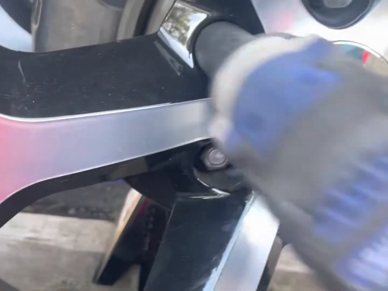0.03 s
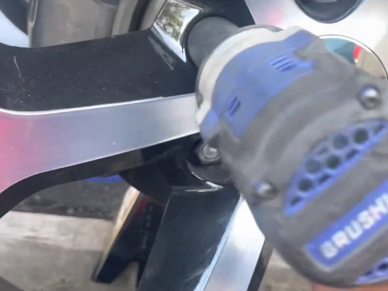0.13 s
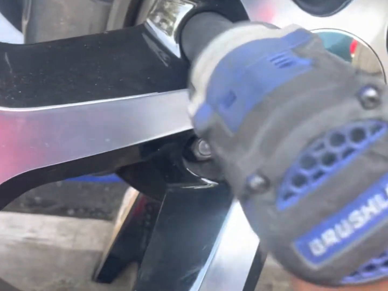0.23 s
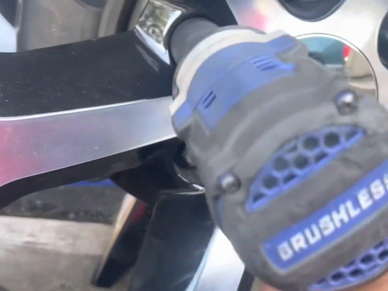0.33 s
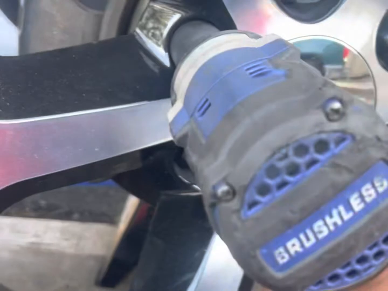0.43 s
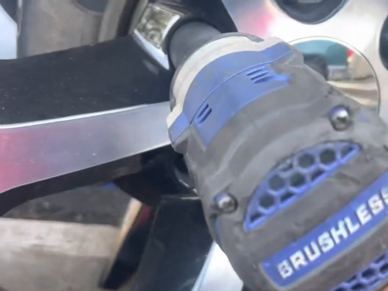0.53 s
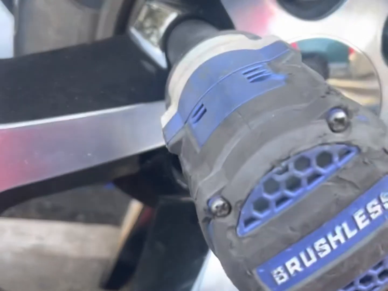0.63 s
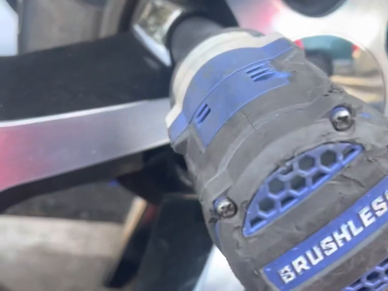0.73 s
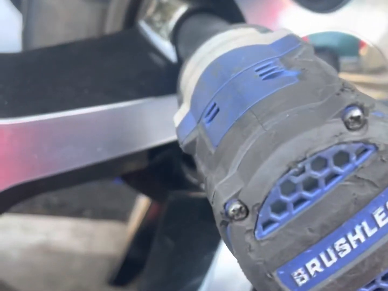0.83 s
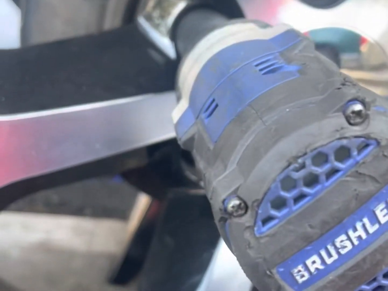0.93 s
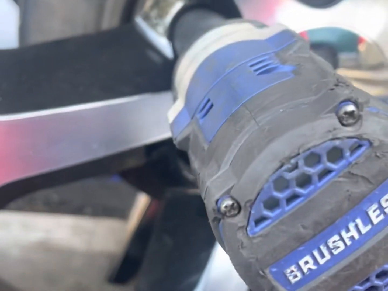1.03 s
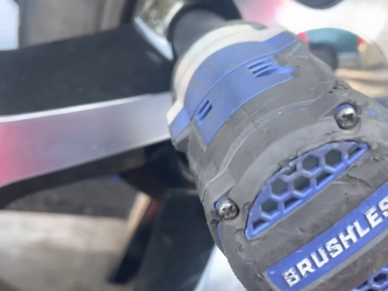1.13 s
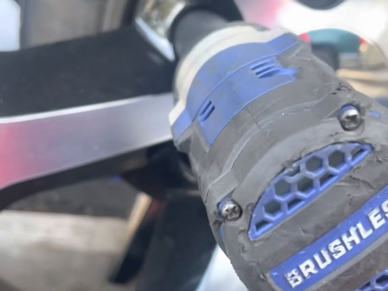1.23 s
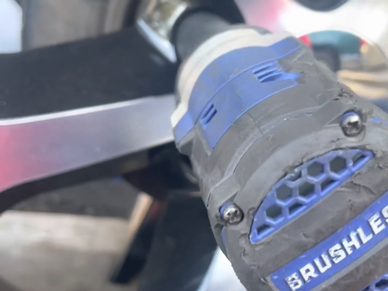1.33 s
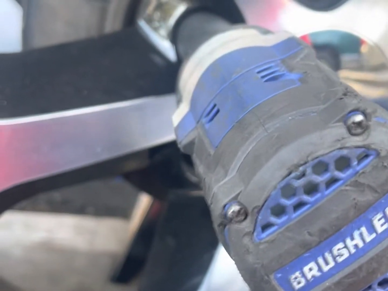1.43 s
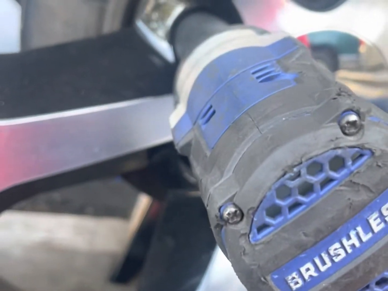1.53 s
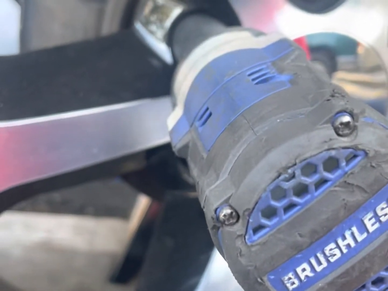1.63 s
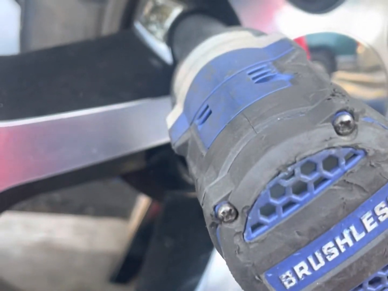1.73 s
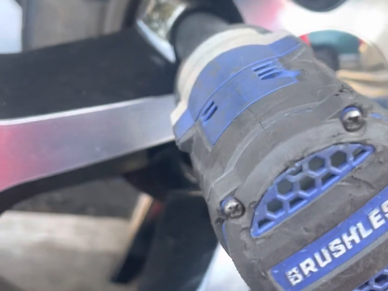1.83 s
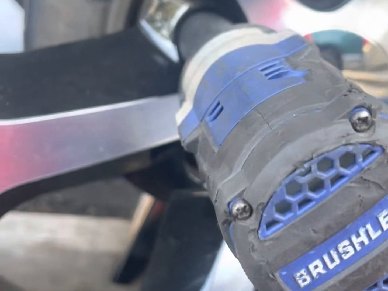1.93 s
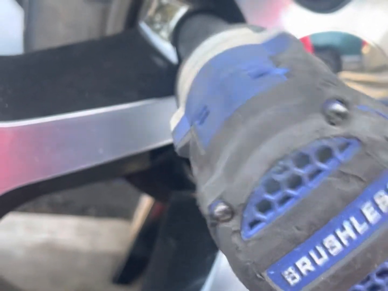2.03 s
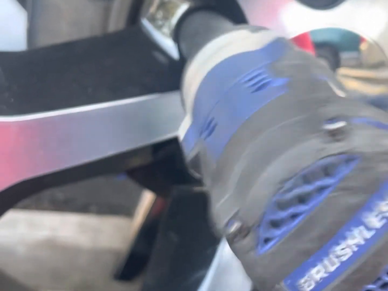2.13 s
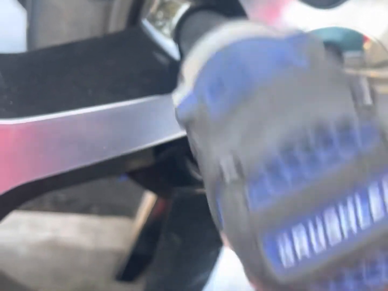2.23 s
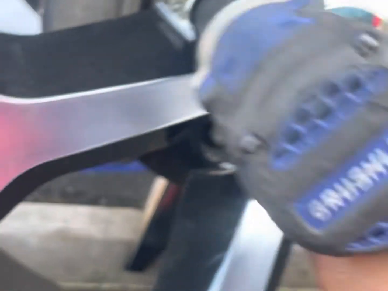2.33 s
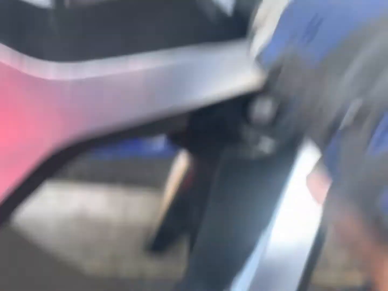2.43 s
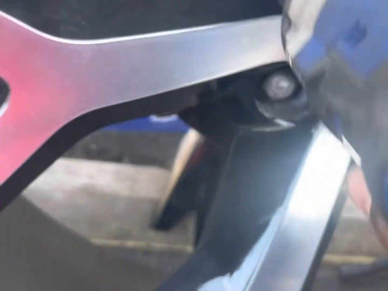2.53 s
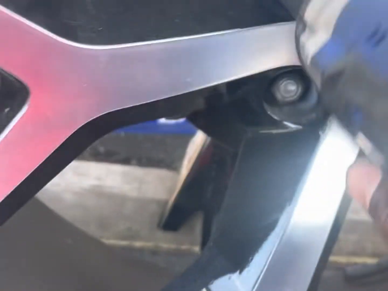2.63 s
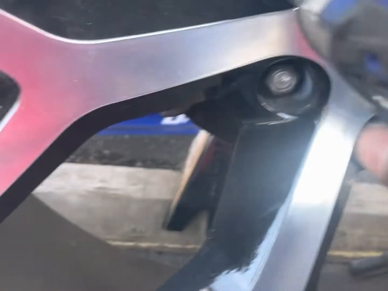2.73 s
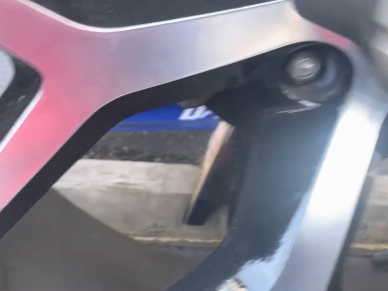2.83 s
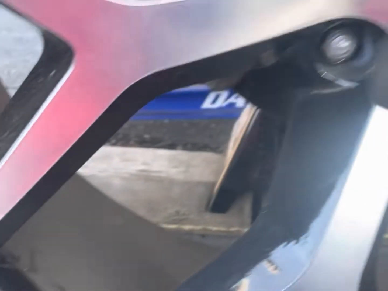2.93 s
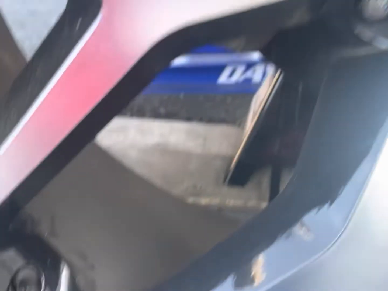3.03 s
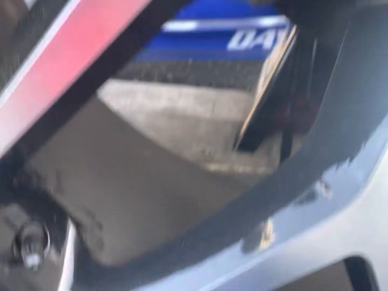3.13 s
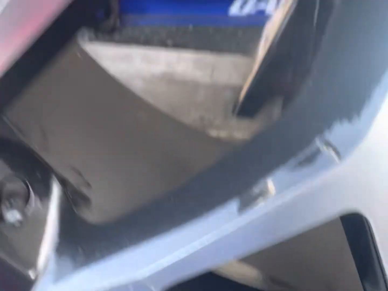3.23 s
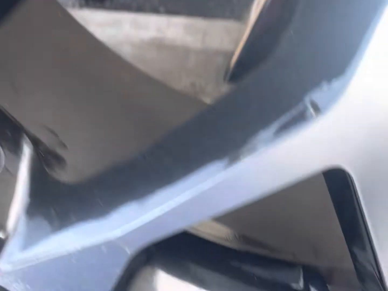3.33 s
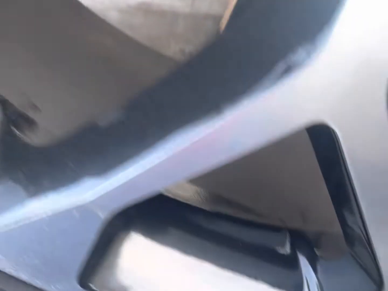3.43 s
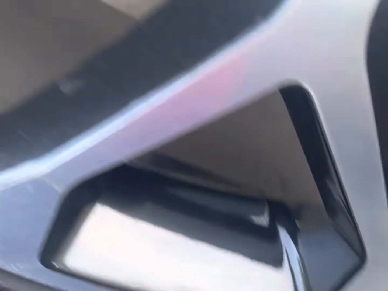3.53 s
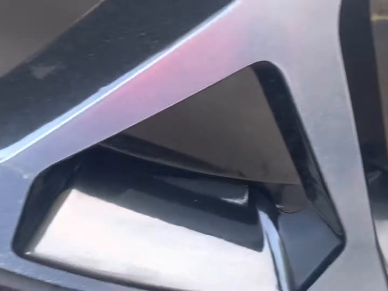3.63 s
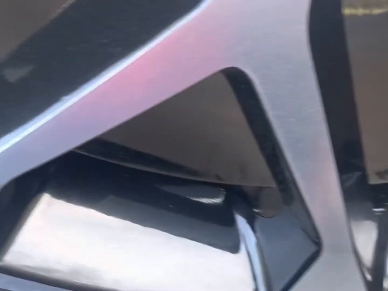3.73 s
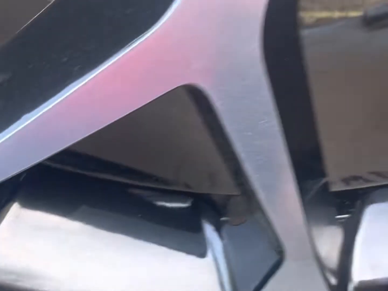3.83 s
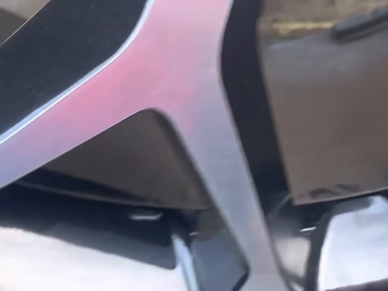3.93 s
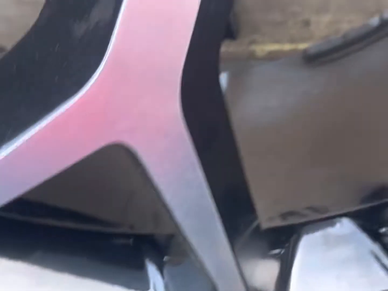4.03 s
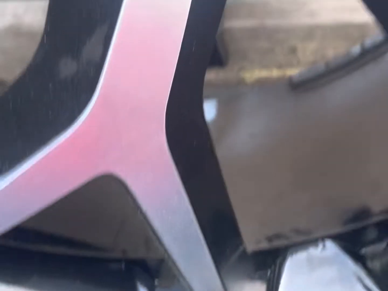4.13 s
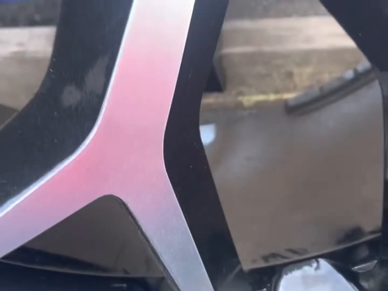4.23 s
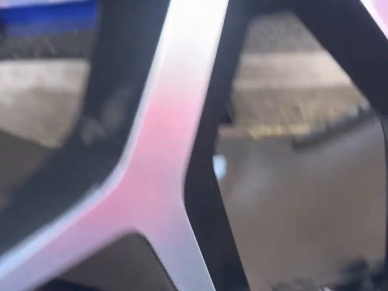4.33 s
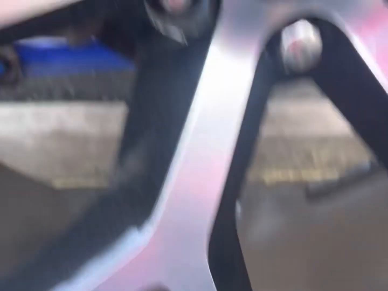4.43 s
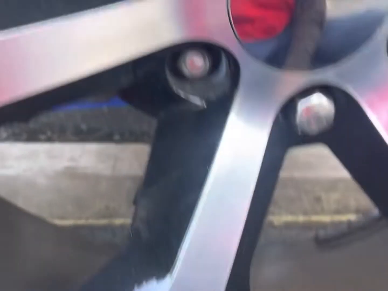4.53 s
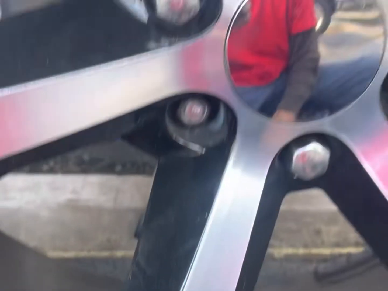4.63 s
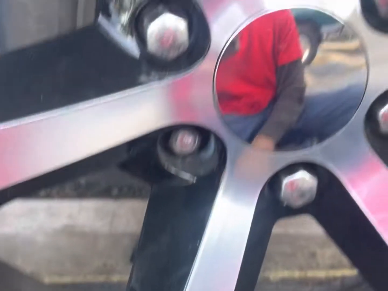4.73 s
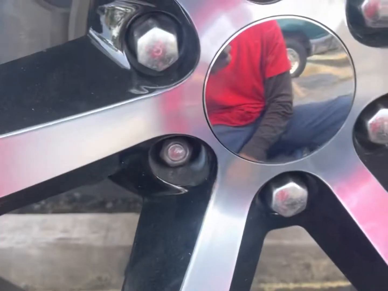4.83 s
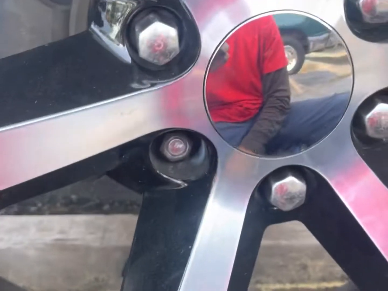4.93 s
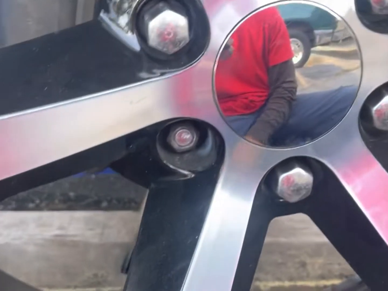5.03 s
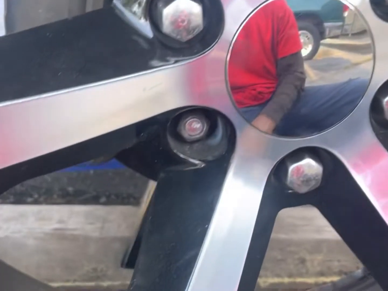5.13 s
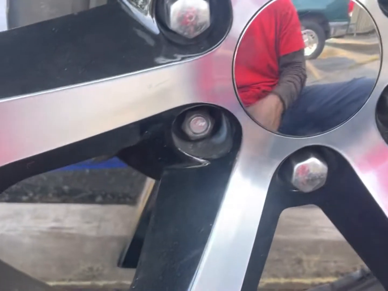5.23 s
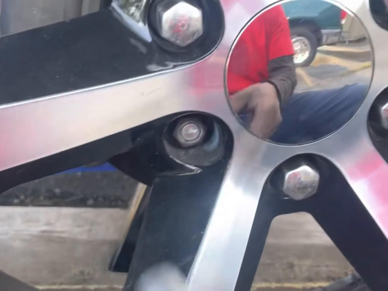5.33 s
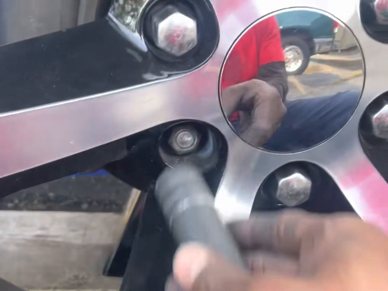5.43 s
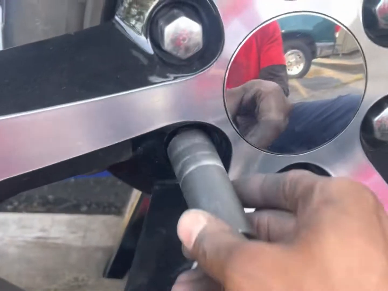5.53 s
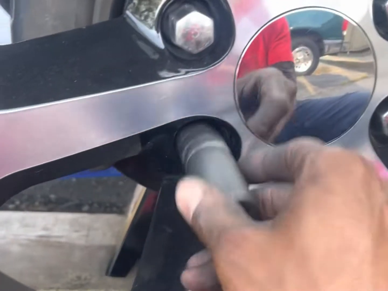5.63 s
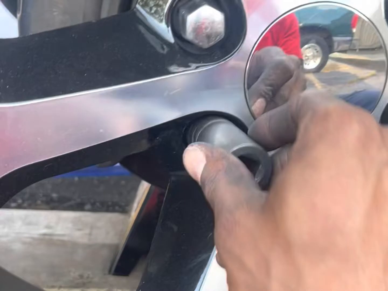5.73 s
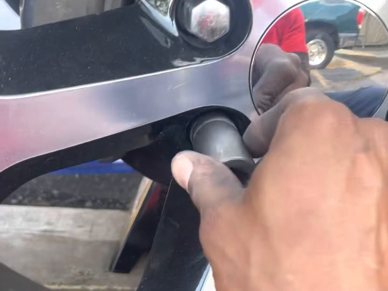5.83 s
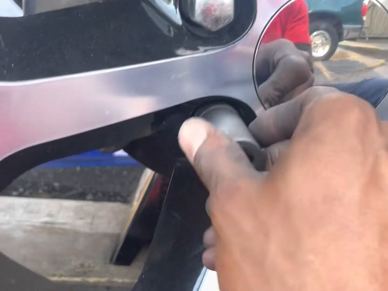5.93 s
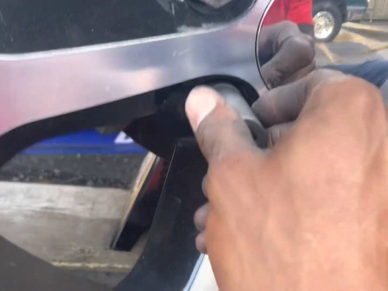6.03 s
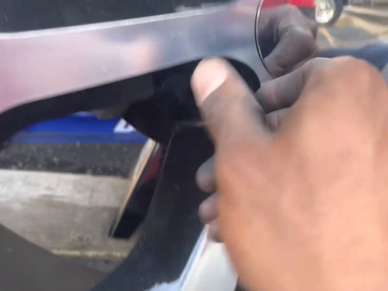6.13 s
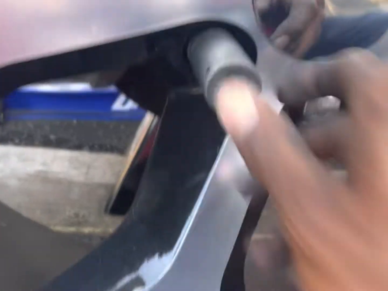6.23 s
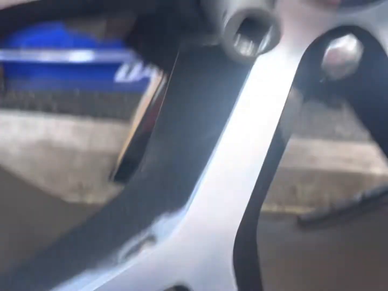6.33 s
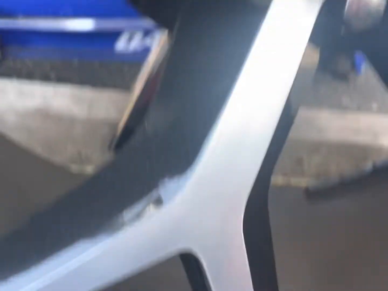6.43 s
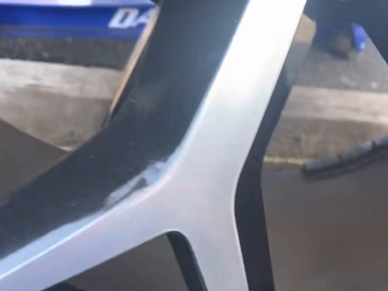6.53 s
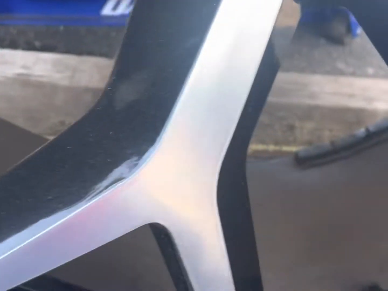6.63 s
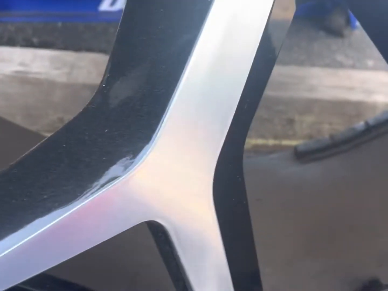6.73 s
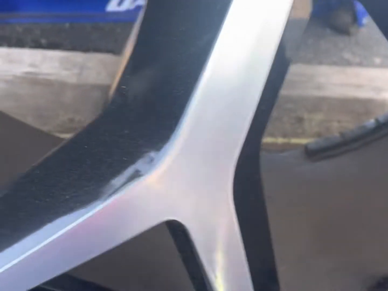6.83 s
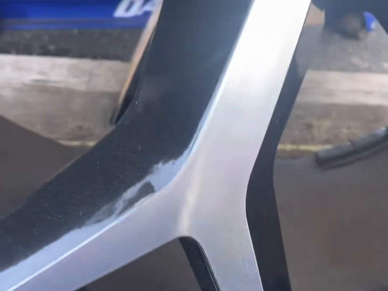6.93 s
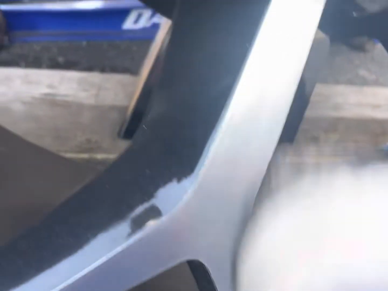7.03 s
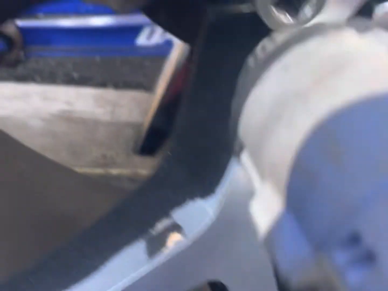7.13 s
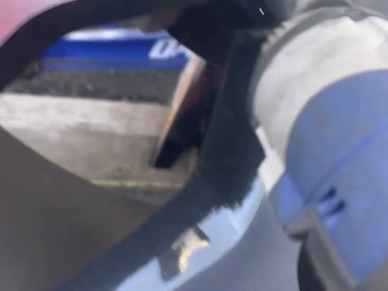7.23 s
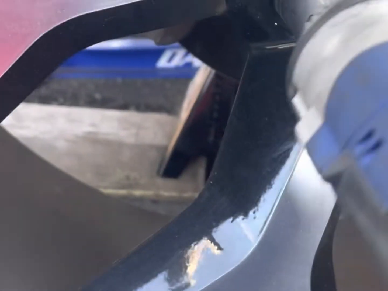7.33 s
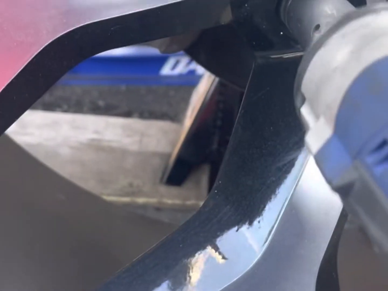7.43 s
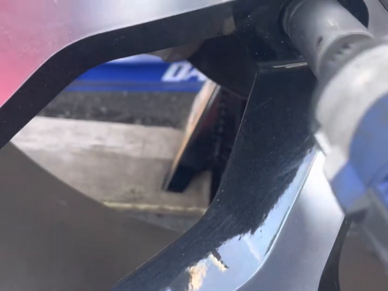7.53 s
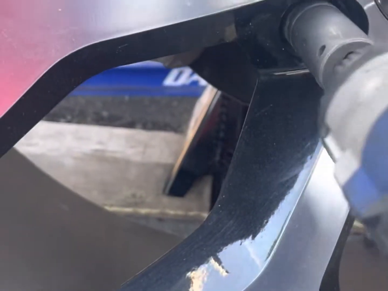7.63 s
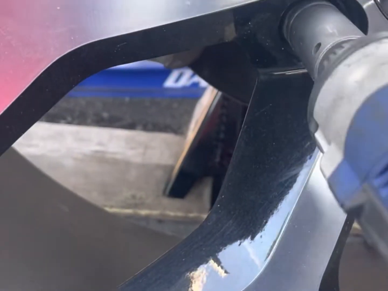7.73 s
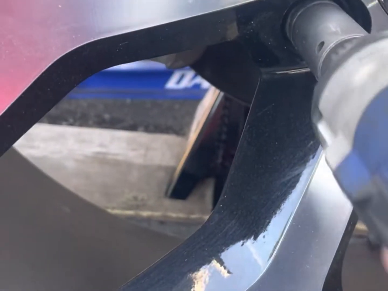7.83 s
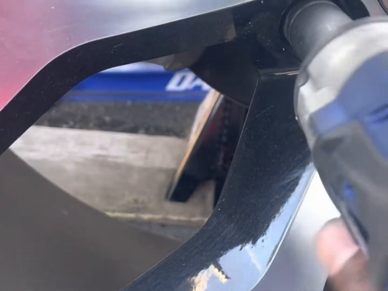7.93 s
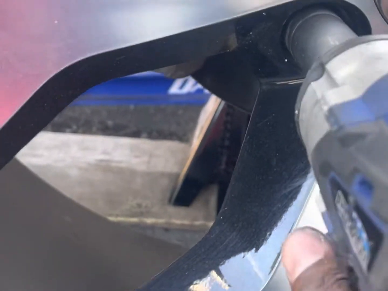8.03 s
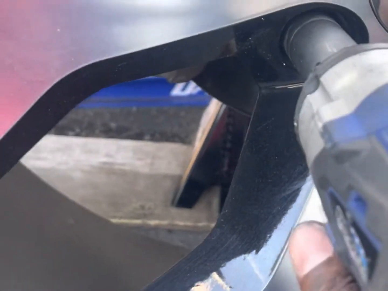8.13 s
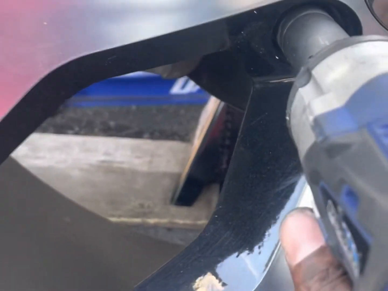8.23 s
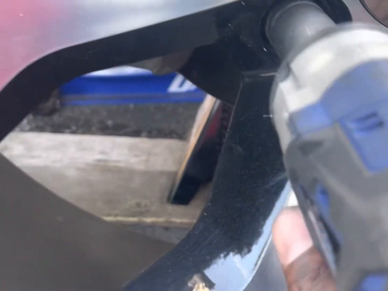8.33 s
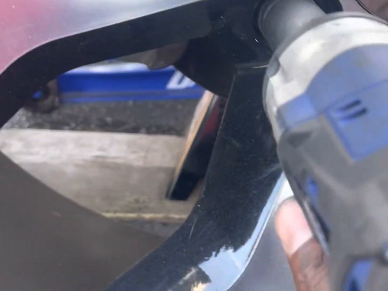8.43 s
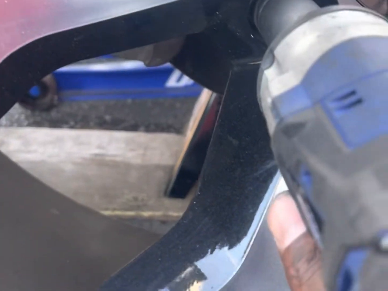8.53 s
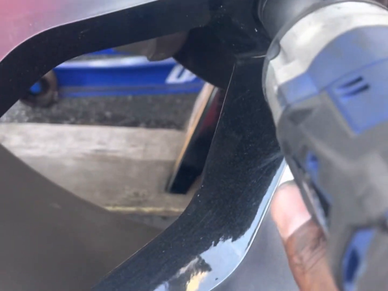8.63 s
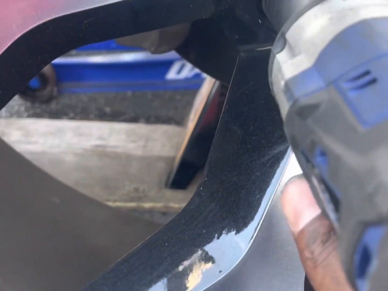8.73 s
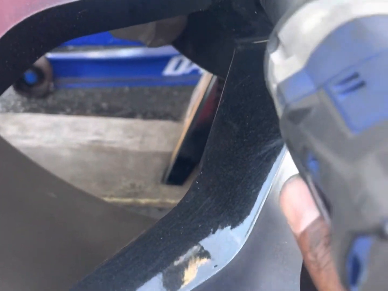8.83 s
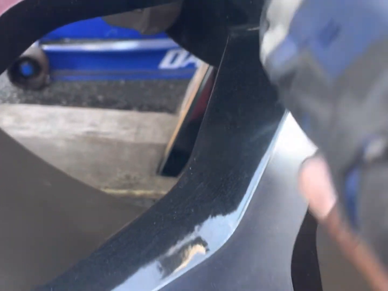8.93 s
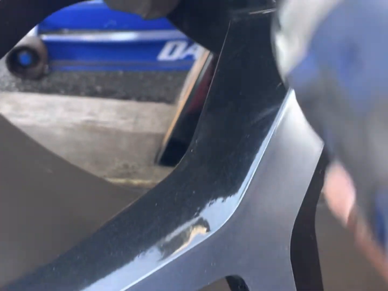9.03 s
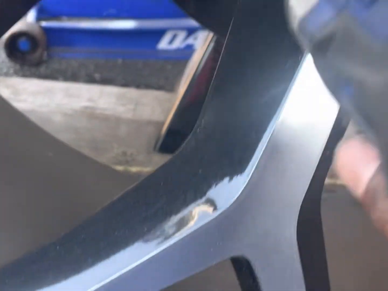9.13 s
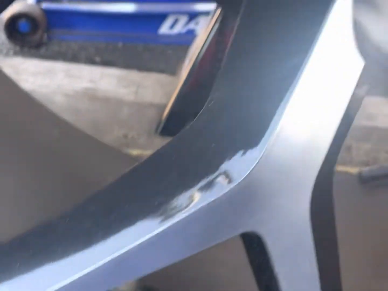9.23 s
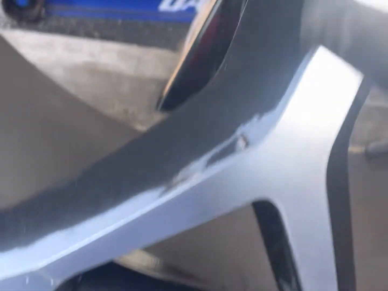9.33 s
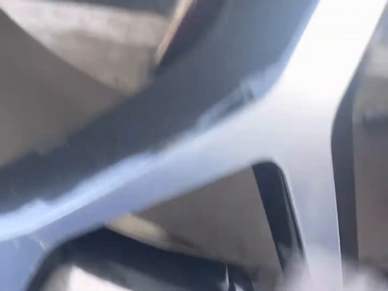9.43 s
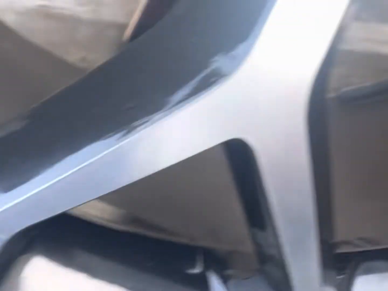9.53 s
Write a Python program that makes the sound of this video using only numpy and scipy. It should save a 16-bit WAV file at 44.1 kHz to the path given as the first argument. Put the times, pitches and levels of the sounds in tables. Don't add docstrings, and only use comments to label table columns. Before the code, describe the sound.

Outdoors beside a car, a phone held very close catches a cordless impact wrench hammering a wheel nut for nearly two seconds, about fifty cracks a second with bassy jolts overloading the microphone. It stops; a socket is set down with knocks and a high steel ring. Quiet taps and clicks follow over faint traffic, then a half-second second burst and small closing clicks.

```python
import sys
import numpy as np
from scipy import signal
from scipy.fft import rfft, irfft, next_fast_len
from scipy.io import wavfile
from scipy.ndimage import uniform_filter1d, map_coordinates

SR = 44100
rng = np.random.default_rng(int(sys.argv[2]) if len(sys.argv) > 2 else 0)


def wav_record(signal):
    frames = np.transpose(np.atleast_2d(signal))
    bounded = np.clip(frames, -1, 1)
    quanta = np.round(bounded * 32767).astype(np.int16)
    wavfile.write(sys.argv[1], SR, quanta)


def volts_from_decibels(level):
    exponent = np.asarray(level, float) / 20
    return 10 ** exponent


N = 422037

# (time [s], level [dB])
AIR_LEVEL = [
    (0, -60),
    (2.1, -64),
    (2.6, -68.5),
    (4.3, -66.5),
    (7.2, -66),
    (8.2, -63),
    (8.902, -70),
    (9.198, -79),
    (9.57, -74),
]
# (frequency [Hz], level [dB])
RUMBLE_SPECTRUM = [(24, -32.5), (40, -2), (108, -2), (261, -10.5), (290, -14), (391, -17), (900, -40.5),
                   (1170, -65), (1980, -120)]
RUSTLE_SPECTRUM = [(290, -35.5), (500, -6.5), (1480, -12), (1790, -11), (1950, -16), (5000, -25.5),
                   (8960, -32.5), (16000, -38.5)]
# (start [s], end [s], from [Hz], to [Hz], level [dB])
FAR_TONES = [
    (5.9, 7.399, 1804, 1820, -93),
    (6.08, 6.38, 3050, 3330, -93),
]

# (frequency [Hz], left lead [rad])
PORT_LEAD = [(1500, 0), (2000, .1), (2760, .7), (3620, .8), (4570, 2.1), (5170, 4.5), (5770, 6.1),
             (8200, 8.3), (9150, 9.42), (10700, 11), (12000, 12.3), (13300, 13.1), (14800, 15.2)]
# (frequency [Hz], level [dB])
SPOKE_SCATTER = [(600, -14.5), (1400, -21.5), (3000, -0.5), (4800, -2), (7000, -8), (9100, -21.5),
                 (11000, -11), (15000, -9)]

# (frequency [Hz], level [dB], t60 [s])
NUT_MODES = [(12600, -14, .097), (12680, 2, 0.32), (12800, -4, .12)]
WHEEL_MODES = np.c_[[651, 1045, 1303, 1690, 1912, 2482, 2572, 3155, 3623, 5749], [(-16.5, .25), (-5, .15),
               (-7, .4), (-20, .2), (-17.5, .3), (-24, .4), (-11, .33), (-14, .26), (-22, .3), (-25, .3)]]
SOCKET_MODES = np.c_[[329, 1030, 1540, 1930, 2213, 2569, 3160, 3680, 4409, 5500, 6495, 6715, 7217, 10430],
                [(-12.5, .04), (-8, .05), (-10, .025), (-9, .04), (-8, .035), (-8, .04), (-10, .05),
                (-13, .03), (-12, .04), (-8, .03), (-2, .055), (-5, .03), (-9, .044), (-7, .0064)]]
HELD_SOCKET_MODES = [(1020, -12.5, 0.36), (1204, -6, 0.099), (2200, -2.5, 0.098), (2700, -10, .06),
                     (3200, 0.5, 0.055), (3500, -14, 0.052), (4400, 5, 0.027)]
ANVIL_MODES = [(2120, -0.5, .012), (2390, -4, .012)]
# (frequency [Hz], level [dB])
CLACK_SPECTRUM = [(750, -24), (950, -6.5), (1250, -7), (2000, -8.5), (2600, -6.5), (2850, -20),
                  (3600, -8.5), (5600, -24)]
SIZZLE_SPECTRUM = [(3800, -30), (4800, -4.5), (6500, -2.5), (8500, -4), (10500, -1), (13000, -18.5),
                   (15000, -21), (16500, -46)]
JOLT_SPECTRUM = [(12, -45.5), (20, -19), (38, -6), (75, 2), (108, -4), (136, -5), (471, -18.5),
                 (698, -25.5), (1000, -31), (1300, -62), (2200, -120)]
HOUSING_SPECTRUM = [(120, -21), (250, 0.5), (450, -1), (800, -6.5), (1100, -29)]

# (middle [s], length [s], level [dB], centre [Hz])
SCRAPES = [(2.36, 0.066, -72.5, 2480), (2.489, .12, -71.5, 1020), (2.682, 0.042, -76.5, 1947),
           (3.296, 0.096, -75, 3010), (3.419, 0.03, -53.5, 4980), (3.502, 0.086, -79, 1205),
           (3.605, 0.15, -78.5, 2490), (3.73, 0.057, -81, 1495), (3.914, 0.088, -77, 1990),
           (4.099, .14, -80.5, 3000), (4.547, 0.039, -70, 904), (4.841, 0.081, -70.5, 894),
           (5.605, 0.23, -78, 1990), (5.77, 0.11, -77, 2530), (7.418, 0.07, -73, 1494),
           (7.861, 0.11, -73, 2470), (8.123, 0.11, -80.5, 3960), (9.028, 0.073, -73.5, 2500),
           (9.148, 0.053, -76.5, 3560)]
# (time [s], level [dB], note [Hz])
SET_DOWN = [(2.246, -55.5, 1312), (3.257, -34, 429.3), (3.286, -52, 2090), (3.337, -55.5, 2050),
            (3.379, -57, 2770), (3.403, -43.5, 980), (3.438, -26.5, 429), (3.541, -46, 855),
            (3.644, -55, 3820), (3.894, -64.5, 976), (7.821, -45.5, 2990), (8.914, -52, 250.6)]
NUDGES = [(3.574, -50.5, 1703), (4.139, -57, 1202), (4.523, -56, 823), (4.816, -58, 1660),
          (4.859, -58, 1110), (4.54, -63, 1513), (4.835, -62.5, 2390), (5.79, -60, 1100), (9.02, -56, 1094)]
CLICKS = [(.042, -29.5, 1110), (.19, -36.5, 2650), (2.28, -56, 1300), (2.344, -49, 820),
          (2.372, -48.5, 1027), (3.258, -33, 1590), (3.439, -38, 3820), (3.584, -44.5, 850),
          (4.055, -52, 2210), (6.14, -61.5, 3025), (6.22, -60.5, 2330), (4.945, -70.5, 1595),
          (4.965, -71, 1400), (5.385, -62, 2505), (6.595, -70.5, 3500), (6.855, -72, 2700),
          (7.04, -71, 2204), (7.513, -43, 2550), (7.607, -54, 2480), (7.836, -25, 2420), (8.223, -30, 2400),
          (9.003, -39.5, 4360), (9.095, -50.5, 2440), (9.118, -39, 3700), (9.127, -42, 3260)]
SEATING = [(.127, -39.5, 2300), (2.332, -49, 2540), (2.455, -58, 1025), (2.659, -55, 2014),
           (3.561, -27, 2192), (3.931, -48.5, 960), (5.522, -40, 3100), (5.539, -47, 1400),
           (5.55, -41, 1070), (5.562, -33.5, 1230), (5.661, -39, 1194), (5.737, -42, 2710),
           (5.778, -50, 4460), (5.793, -49, 4400), (5.892, -69, 4365), (7.305, -33.5, 1025),
           (7.5, -52, 1350), (7.619, -50.5, 4320), (7.664, -44, 981), (8.172, -32, 2007)]
# (time [s], level [dB])
NUT_CHIMES = [
    (3.257, -76.5),
    (3.44, -57.5),
    (3.561, -45.5),
    (4.53, -75.5),
]
# (time [s], level [dB])
WHEEL_TAPS = [
    (.042, -55),
    (2.099, -39.5),
    (5.562, -63.5),
    (5.793, -75),
    (7.836, -59),
    (8.172, -75.5),
]
# (time [s], level [dB])
SOCKET_RATTLES = [(2.345, -66), (2.46, -78.5), (2.49, -73), (2.53, -71), (2.68, -82), (2.75, -68.5),
                  (3.935, -76), (4.06, -68.5), (5.74, -63), (7.44, -78.5), (7.665, -73.5), (9.02, -64)]
# (time [s], level [dB])
SOCKET_KNOCKS = [
    (5.522, -57.5),
    (5.539, -59),
    (5.562, -55),
    (5.661, -57),
    (5.737, -59.5),
    (5.793, -72),
    (7.305, -67),
    (7.513, -62),
]

# (squeeze [s], load taken [s], release [s], whirr [dB])
TRIGGER_PULLS = [
    (0.203, 0.309, 2.11, -32.5),
    (8.217, 8.282, 8.852, -31.5),
]
# (time [s], level [dB])
SPIN_UP = [(0, -40), (.024, -7)]
SPIN_DOWN = [(.022, -24), (.055, -34), (.14, -50)]

# (time [s], clack [dB], sizzle [dB])
SLACK_KNOCKS = [(0.228, -24, -31.5), (0.234, -30.5, -30.5), (0.24, -28, -30), (0.256, -24, -27),
                (0.26, -27.5, -29.5), (0.27, -33, -30.5), (2.09, -18, -23.5), (2.099, -15.5, -22),
                (8.248, -18, -22), (8.259, -16.5, -27), (8.27, -16, -19)]
# (time [s], level [dB])
REBOUNDS = [(0.316, -16), (0.82, -15.5), (0.8419, -21.5), (0.8579, -19.5), (0.9353, -17.5), (0.953, -19),
            (0.9731, -19.0), (0.9984, -21.0), (1.0507, -16), (1.1466, -15.5), (1.2055, -15), (1.23, -19),
            (1.2435, -17.0), (1.2492, -18.0), (1.345, -19), (1.4347, -13), (1.4405, -21.5), (1.4541, -22.5),
            (1.4922, -14.5), (1.501, -18), (1.5515, -14.0), (1.5586, -16.5), (1.611, -19), (1.6171, -19.5),
            (1.6686, -17.5), (1.6772, -17.5), (1.7271, -16.0), (1.7333, -21.5), (1.7666, -17.5),
            (1.8431, -16.0), (1.8816, -18), (1.9385, -13.5), (1.944, -17.5), (2.016, -22.5), (8.3124, -15),
            (8.4179, -22.5), (8.6395, -20.5), (8.677, -22.5), (8.7153, -23.5), (8.753, -20), (8.7903, -17),
            (8.8558, -19)]
# (time [s], jolt signed in or out [full scale])
AFTERSHOCKS = [
    (2.0966, -0.048),
    (2.146, -.012),
    (8.865, -0.033),
    (8.911, 0.011),
]
# (time [s], clack [dB], sizzle
# [dB], jolt signed in or out [full scale])
FIRST_NUT_BLOWS = [(0.3115, -25.5, -18.5, -0.01), (0.333, -21.5, -20, -0.0), (0.3534, -22.5, -17.5, -0.01),
                   (0.3714, -24, -15.5, -0.02), (0.39, -24, -16.5, -0.0), (0.4085, -22.0, -15.5, 0.03),
                   (0.4266, -23.0, -18.0, -0.0), (0.443, -24.0, -15.5, -0.01), (0.4632, -22.5, -16.5, -0.0),
                   (0.481, -24.5, -17.5, -0.0), (0.4988, -23.5, -16.0, -0.01), (0.5176, -23.0, -16.5, -0.01),
                   (0.5353, -22.5, -15, 0.0), (0.5528, -22.5, -18.0, 0.01), (0.571, -22.5, -16.0, 0.14),
                   (0.59, -20.5, -15.5, -0.14), (0.6075, -18.5, -15.5, -0.18), (0.625, -19.5, -14, 0.3),
                   (0.6441, -20.5, -16, -0.21), (0.6625, -19, -15.5, -0.22), (0.6812, -20.5, -15, 0.88),
                   (0.6999, -20.5, -14.5, -0.7), (0.7187, -19, -12, 0.7), (0.7373, -18, -14.5, -0.36),
                   (0.7562, -21.5, -12, 0.98), (0.7752, -20, -15, -0.56), (0.7947, -17, -12.5, 0.98),
                   (0.8128, -19.0, -14.5, -0.7), (0.8308, -17, -14, 0.85), (0.8507, -21, -16.5, -0.25),
                   (0.869, -20, -13, 0.26), (0.8889, -20, -13, -0.07), (0.9092, -17.5, -12.5, -0.13),
                   (0.9283, -20, -13.0, 0.15), (0.946, -18, -12.0, -0.46), (0.9654, -18.5, -17.5, 0.48),
                   (0.9846, -17.5, -13.0, 0.3), (1.0042, -21.0, -14.5, -0.16), (1.024, -19.0, -14.5, 0.24),
                   (1.043, -20, -15.0, 0.05), (1.062, -17.5, -13, 0.23), (1.082, -20.5, -14.5, -0.16),
                   (1.102, -17.5, -10, 0.2), (1.12, -21, -11.5, 0.74), (1.1391, -20.5, -15.0, -0.54),
                   (1.157, -17.5, -13, 0.62), (1.178, -21.0, -16.0, -0.03), (1.198, -18.5, -14.5, -0.22),
                   (1.216, -18, -12, 0.49), (1.2364, -20, -14.0, -0.29), (1.2536, -18.5, -11.5, 0.48),
                    (1.275, -22.5, -15.5, -0.23), (1.2938, -23.0, -16, 0.01), (1.3142, -18, -14, 0.61),
                    (1.331, -18, -12, 0.22), (1.3513, -18.5, -13.5, -0.01), (1.3686, -16.5, -12, 0.26),
                    (1.3894, -16.5, -14.5, -0.15), (1.4089, -25, -11.5, 0.01), (1.429, -21, -14, 0.076),
                    (1.4444, -16.5, -12.0, 0.23), (1.467, -19, -12, -0.24), (1.4863, -20.5, -13.5, 0.27),
                    (1.5039, -19, -13, 0.36), (1.5248, -21.5, -13, -0.59), (1.5463, -18.0, -13.5, 0.65),
                    (1.562, -21.5, -11.5, -0.38), (1.584, -20.5, -14.0, 0.27), (1.6036, -22, -15.0, 0.0011),
                    (1.6219, -20, -14, -0.04), (1.6424, -21.0, -15.5, -0.18), (1.6632, -21.0, -15.5, 0.63),
                    (1.6792, -18.5, -12.5, -0.77), (1.7003, -22.0, -16, 0.31), (1.7213, -23, -12.5, 0.17),
                    (1.7384, -22.0, -10, -0.023), (1.7593, -23.0, -17.0, -0.51), (1.7782, -20, -11.5, 0.68),
                    (1.7988, -21.5, -18, -0.39), (1.8168, -23.5, -15, 0.17), (1.8374, -24, -17.0, -0.12),
                    (1.8538, -21.5, -12, 0.076), (1.874, -22.5, -18, -0.5), (1.893, -19, -12.5, 0.49),
                    (1.9138, -21.0, -14, -0.29), (1.934, -20.5, -15.5, 0.045), (1.9496, -17.5, -15.0, 0.82),
                    (1.9721, -18.5, -13.5, -0.44), (1.9912, -28, -14.5, -0.19), (2.0117, -22, -17.5, 0.23),
                    (2.0318, -22.0, -18, 0.41), (2.052, -22.5, -16.5, -0.095), (2.0703, -18.0, -15.5, 0.58)]
SECOND_NUT_BLOWS = [(8.303, -16.5, -8.5, 0.58), (8.3288, -18, -8.5, -0.36), (8.3485, -12, -12, 0.78),
                    (8.3677, -15, -12.0, -0.59), (8.3872, -12, -12, 0.48), (8.406, -15, -10.5, -0.57),
                    (8.4261, -17.0, -11, -0.11), (8.4428, -16.5, -14.0, 0.02), (8.4631, -19, -13, 0.29),
                    (8.4812, -20.5, -14.5, -0.52), (8.4995, -17.5, -15, 0.93), (8.518, -18.0, -14, -0.38),
                    (8.5364, -20.5, -11.0, 0.09), (8.5556, -17, -15, 0.41), (8.575, -14.5, -13.0, -0.62),
                    (8.5935, -22.0, -13.5, -0.21), (8.612, -15.5, -13, 0.72), (8.6301, -21.5, -15.5, -0.51),
                    (8.6491, -14.5, -13.0, 0.31), (8.669, -27.5, -16.5, -0.11), (8.6862, -15, -10.0, 0.54),
                    (8.7068, -25.5, -15.0, -0.07), (8.7263, -22.5, -11.5, 0.06),
                    (8.7457, -23.0, -15.5, -0.35), (8.7634, -18.5, -11.0, 0.52),
                    (8.7843, -19.5, -16.5, -0.18), (8.802, -16.5, -9.0, 0.19),
                    (8.8212, -20.5, -15.5, -0.13), (8.8439, -16, -10.5, 0.13)]
# (frequency [Hz], level [dB])
LOOSE_COLOUR = [(420, -1), (740, -8.5), (900, 1), (1030, -1), (1450, 2), (2000, -1), (2500, -1.5),
                (3000, -2), (4200, 0.5), (5500, 0.5)]
FIRST_NUT_COLOUR = [(1030, -3.5), (1500, -1.2), (2300, -1), (2800, -2.5), (3400, -2.5), (3750, -1),
                    (4600, 0.5)]
SECOND_NUT_COLOUR = [(1000, -4.5), (1350, -2), (1800, -2), (2300, -6.5), (3100, -0.5), (3400, 3),
                     (3900, -0.5), (4450, 4.5), (6500, -2), (7800, 5), (9500, 2)]

# (contacts, sizzle over clack [dB], thud over clack [dB])
CONTACT_KINDS = [(SET_DOWN, -5, -5.5), (NUDGES, -27.5, 2.6), (CLICKS, -9, -22.5), (SEATING, -23.5, -23.5)]
LENGTH = 4096
STEADY_S, TIGHT_S = .38, .545
MOVED_S = 5
OPPOSITE = np.array([[1], [-1]])


def along(points, hz):
    f, v = np.transpose(points)
    return np.interp(np.log(hz + 1), np.log(f + 1), v)


def unit(x):
    return x / np.sqrt(np.mean(x ** 2) + 1e-20)


def filtered(x, response):
    n = x.shape[-1]
    m = next_fast_len(n + 8192)
    return irfft(rfft(x, m) * response(np.fft.rfftfreq(m, 1 / SR)), m)[..., :n]


def hiss(shape, spectrum):
    def response(hz):
        inside = (hz > spectrum[0][0]) & (hz < spectrum[-1][0])
        return volts_from_decibels(along(spectrum, hz)) * inside
    return unit(filtered(rng.standard_normal(shape), response))


def wobble(rate):
    knots = rng.standard_normal(int(N * rate / SR) + 4)
    return map_coordinates(knots, [np.arange(N) * rate / SR])


def placed(times, rows):
    where = np.round(times * SR).astype(int)[:, None] + np.arange(rows.shape[1])
    return np.bincount(np.maximum(where, 0).ravel(), rows.ravel(), N + rows.shape[1])[:N]


def rings(modes, count, size, scatter_db, slip):
    hz, db, t60 = np.transpose(modes)[:, :, None]
    t = np.arange(size) / SR
    attack = 1 - np.exp(-t / 0.000045)
    wave = volts_from_decibels(db - 60 * t / t60) * attack * np.exp(2j * np.pi * hz * t)
    chance = rng.standard_normal((count, 2, len(hz)))
    strength = volts_from_decibels(scatter_db * chance[:, 0]) * np.exp(1j * slip * chance[:, 1])
    return (strength @ wave).imag


def struck(table, modes):
    s, db = np.transpose(table)
    ring = rings(modes, count=len(s), size=6 * LENGTH, scatter_db=3.0, slip=4.38)
    return placed(s, volts_from_decibels(db)[:, None] * ring)


def cracks(clack_db, sizzle_db, clack_t60, sizzle_t60, rise, chatter_db, alike=0):
    t = np.arange(LENGTH) / SR
    shape = (len(clack_db), LENGTH)
    attack = 1 - np.exp(-t / rise)
    swing = unit(uniform_filter1d(rng.standard_normal(shape), size=40))
    chatter = volts_from_decibels(chatter_db * np.tanh(swing / 2) * 2)
    repeated = np.sqrt(alike) * hiss(LENGTH, CLACK_SPECTRUM)
    grain = repeated + np.sqrt(1 - alike) * chatter * hiss(shape, CLACK_SPECTRUM)
    clack = volts_from_decibels(clack_db[:, None] - 60 * t / clack_t60) * grain
    sizzle = volts_from_decibels(sizzle_db[:, None] - 60 * t / sizzle_t60) * chatter * hiss(shape, SIZZLE_SPECTRUM)
    return attack * (clack + sizzle)


def ports(x):
    pair = filtered(x, lambda hz: np.exp(.5j * along(PORT_LEAD, hz) * OPPOSITE))
    z = signal.stft(x, nperseg=64)[2]
    random_phase = np.exp(2j * np.pi * rng.random((2, *z.shape)))
    scatter = signal.istft(z * random_phase, nperseg=64)[1][:, :N]
    return pair + filtered(scatter, lambda hz: volts_from_decibels(along(SPOKE_SCATTER, hz)))


def air():
    s, rumble_db = np.transpose(AIR_LEVEL)
    rustle_db = -72 + 0.37 * (rumble_db - rumble_db.mean())
    t = np.arange(N) / SR
    rumble = volts_from_decibels(np.interp(t, s, rumble_db) + 1.3 * wobble(9)) * hiss(N, RUMBLE_SPECTRUM)
    rustle = 0.21 * hiss((2, N), RUSTLE_SPECTRUM) + 0.12 * ports(hiss(N, RUSTLE_SPECTRUM))
    return rumble + volts_from_decibels(np.interp(t, s, rustle_db) + 2 * wobble(7.9)) * rustle


def far_tones():
    t, out = np.arange(N) / SR, 0
    for start, end, from_hz, to_hz, db in FAR_TONES:
        u = np.clip((t - start) / (end - start), 0, 1)
        hz = (from_hz + (to_hz - from_hz) * u) * (1 + .008 * wobble(60))
        swell = np.sin(np.pi * u) ** .5
        out = out + volts_from_decibels(db + 2.52 * wobble(25)) * swell * np.sin(2 * np.pi * np.cumsum(hz) / SR)
    return out


def rubbing():
    s, length, db, centre = np.transpose(SCRAPES)
    t = (np.arange(4 * LENGTH) - 2 * LENGTH) / SR
    grains = volts_from_decibels(4 * unit(uniform_filter1d(rng.standard_normal((len(s), len(t))), size=250)))
    noise = np.array([hiss(len(t), [(f / 5, -24), (f / 1.0, 0), (f * 0.75, 0), (f * 5, -30)])
                      for f in centre])
    swell = np.exp(-(2 * t / length[:, None]) ** 2)
    return placed(s + t[0], volts_from_decibels(db)[:, None] * swell * unit(grains * noise))


def handling():
    contacts = [(*row, row[1] + bright_db, row[1] + dull_db)
                for rows, bright_db, dull_db in CONTACT_KINDS for row in rows]
    s, clack_db, hz, sizzle_db, thud_db = np.transpose(contacts)
    snap = cracks(clack_db - 7, sizzle_db + 1.0,
                  clack_t60=0.008, sizzle_t60=0.016, rise=0.00047, chatter_db=4.5)
    tail = cracks(clack_db - 18.0, sizzle_db - 16,
                  clack_t60=0.047, sizzle_t60=0.066, rise=0.00037, chatter_db=8.5)
    t = np.arange(LENGTH) / SR
    note = volts_from_decibels(clack_db[:, None] - 6.5 - 60 * t / 0.025) * np.sin(2 * np.pi * hz[:, None] * t)
    dull = hiss(snap.shape, [(80, -27.0), (200, 3.5), (500, 1.5), (1200, -21.0)])
    thud = volts_from_decibels(thud_db[:, None] + 0.5 - 60 * t / 0.049) * dull
    ringing = struck(WHEEL_TAPS, WHEEL_MODES) + struck(SOCKET_RATTLES, SOCKET_MODES)
    ringing = ringing + struck(SOCKET_KNOCKS, HELD_SOCKET_MODES)
    return placed(s - .0006, snap + note + tail + thud) + ringing


def nut_chimes():
    return struck(NUT_CHIMES, NUT_MODES) * volts_from_decibels(.8 * OPPOSITE)


def motor():
    t, level = np.arange(N) / SR, 0
    for squeeze, load, release, whirr_db in TRIGGER_PULLS:
        course = [*np.add(SPIN_UP, (squeeze, 0)), (load, -7), (load + 0.014, 0),
                  (release, -0.5), *np.add(SPIN_DOWN, (release, 0))]
        s, db = np.transpose(course)
        level = level + volts_from_decibels(whirr_db + np.interp(t, s, db, -120, -120))
    level = level * volts_from_decibels(-4 * ((t > STEADY_S) & (t < TIGHT_S)))
    grit = volts_from_decibels(2 * wobble(200))
    gears = grit * (hiss(N, CLACK_SPECTRUM) + 1.7 * hiss(N, SIZZLE_SPECTRUM))

    def through_socket(f):
        body = 0.62
        for centre, db, t60 in SOCKET_MODES:
            damping = 1j * f * 9 / t60
            body = body + volts_from_decibels(db) * damping / (centre * centre - f * f + damping)
        return body / (1 + (f / 8200) ** 4) / (1 + (f / 12600) ** 24)

    return level * (unit(filtered(gears, through_socket)) + 0.36 * hiss(N, HOUSING_SPECTRUM))


def rebounds():
    s, db = np.transpose(REBOUNDS)
    crack = cracks(db - 5.5, db - 6.5, clack_t60=0.013, sizzle_t60=0.025, rise=0.000073, chatter_db=1.5)
    ring = rings(SOCKET_MODES, count=len(s), size=LENGTH, scatter_db=6.0, slip=4.4)
    return placed(s, crack + volts_from_decibels(db - 12.5)[:, None] * ring)


def blows():
    s, clack_db, sizzle_db, jolt = np.transpose(FIRST_NUT_BLOWS + SECOND_NUT_BLOWS)
    free = np.flatnonzero((s > STEADY_S) & (s < TIGHT_S))
    s[free] = np.linspace(s[free[0]], s[free[-1]], len(free))
    unrest = np.clip((s - TIGHT_S) / .14, .06, 1)
    return s, clack_db + 6, sizzle_db - 2, jolt, unrest[:, None]


def hammer(s, clack_db, sizzle_db, unrest):
    count, second = len(s), s > MOVED_S
    crack = cracks(clack_db - .6, sizzle_db + 2.0, clack_t60=0.012, sizzle_t60=0.021,
                   rise=0.00034, chatter_db=3.0, alike=1 - 0.66 * unrest)
    socket_gain = volts_from_decibels((clack_db + sizzle_db) / 2 - 9.5)[:, None] * volts_from_decibels(-1.5 * (1 - unrest))
    socket = socket_gain * rings(SOCKET_MODES, count, LENGTH, scatter_db=5.1 * unrest, slip=0.17 * unrest)
    wheel_gain = volts_from_decibels(clack_db - 40.5 - 7 * second)[:, None]
    wheel = wheel_gain * rings(WHEEL_MODES, count, 6 * LENGTH, scatter_db=1.0, slip=0.95)
    knock_gain = volts_from_decibels(clack_db - 4 - 2.3 * second)[:, None]
    knock = knock_gain * rings(ANVIL_MODES, count, LENGTH, scatter_db=1.9 * unrest, slip=.8 * unrest)
    when, low_db, high_db = np.transpose(SLACK_KNOCKS)
    slack = cracks(low_db - 9.5, high_db + 0.5,
                   clack_t60=0.037, sizzle_t60=0.023, rise=0.0002, chatter_db=7.0)
    struck_blows = placed(s + .0009, crack + socket + knock) + placed(s + 0.00033, wheel)
    return struck_blows + placed(when - .0005, slack)


def facing(tool):
    stage = np.digitize(np.arange(N) / SR, [TIGHT_S, MOVED_S])
    out = 0
    for k, colour in enumerate([LOOSE_COLOUR, FIRST_NUT_COLOUR, SECOND_NUT_COLOUR]):
        out = out + filtered(tool * (stage == k), lambda hz: volts_from_decibels(along(colour, hz)))
    return out


def thump(times, heights):
    def shape(hz):
        return volts_from_decibels(along(JOLT_SPECTRUM, hz)) * np.exp(.2j)
    peak = filtered(np.eye(1, LENGTH)[0], shape)[0]
    edge_db = 4.5 * rng.standard_normal(len(times)) + 2.5 * (times > MOVED_S)
    edges = heights * (volts_from_decibels(edge_db) - 1)
    sharp = filtered(placed(times, edges[:, None]), lambda hz: 1 / (1 + (300 / (hz + 1)) ** 4))
    return filtered(placed(times, heights[:, None]) + sharp, shape) / peak


def scene():
    s, clack_db, sizzle_db, jolt, unrest = blows()
    late_s, late_jolt = np.transpose(AFTERSHOCKS)
    pushes = thump(np.r_[s + 0.00029, late_s], np.r_[jolt, late_jolt])
    port_lead_s = .00004
    shaken = filtered(pushes, lambda hz: np.exp(1j * np.pi * hz * port_lead_s * OPPOSITE))
    lean_db = .2 * wobble(20) * OPPOSITE
    tool = facing(hammer(s, clack_db, sizzle_db, unrest) + rebounds() + motor())
    near = ports(tool + handling() + rubbing())
    return air() + far_tones() + near + nut_chimes() + volts_from_decibels(lean_db) * shaken


def band_limit(x):
    return signal.sosfilt(signal.butter(12, 16800, fs=SR, output="sos"), x)


def record(dry):
    mix = filtered(dry, lambda hz: np.exp(-1.4j * np.pi * np.log(1 + (hz / 30) ** 2)))
    mix = mix / (1 + np.abs(mix / .97) ** 6) ** (1 / 6)
    return band_limit(mix)


dry = scene()
out = record(dry)
wav_record(out)
```